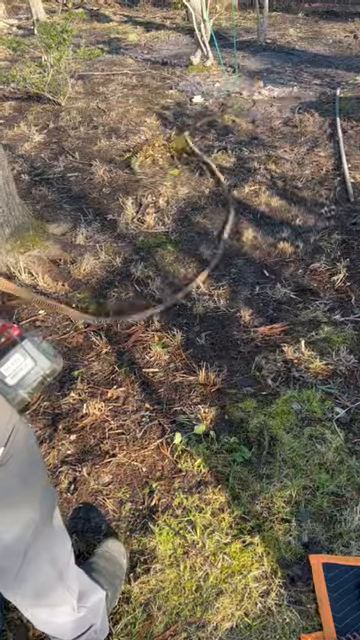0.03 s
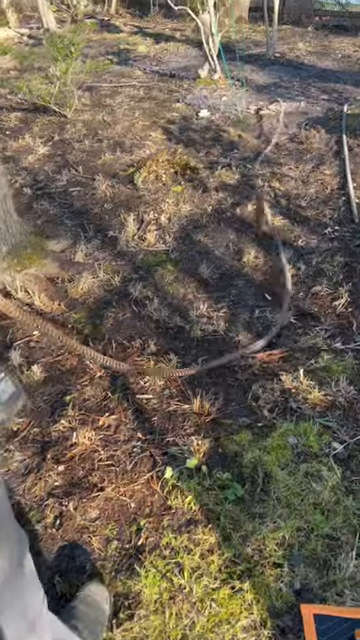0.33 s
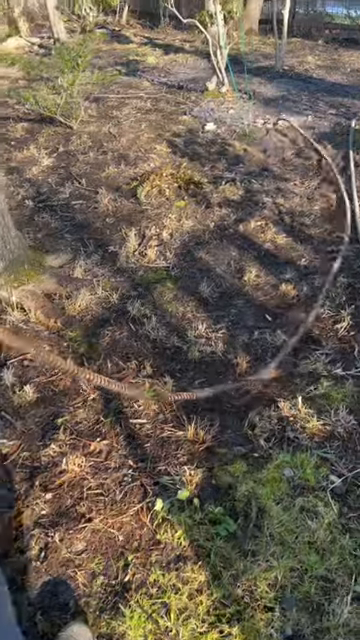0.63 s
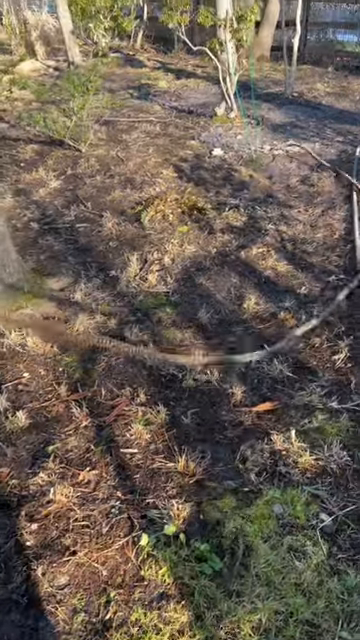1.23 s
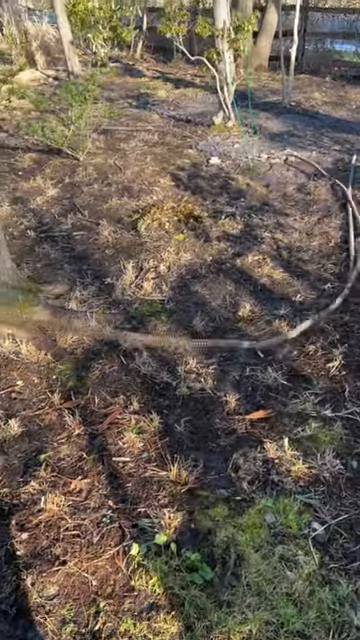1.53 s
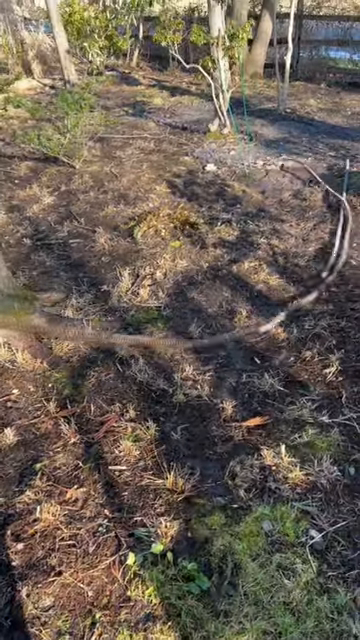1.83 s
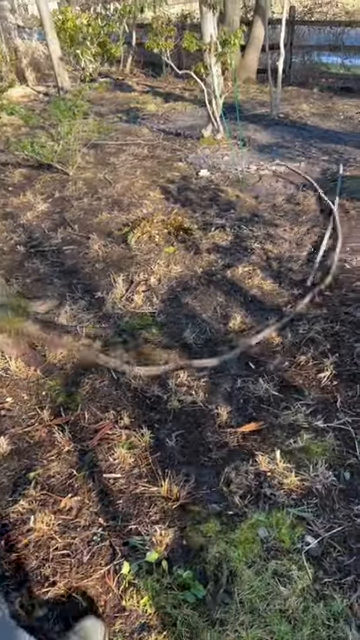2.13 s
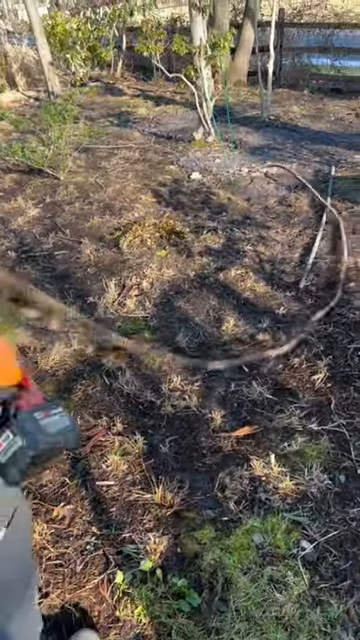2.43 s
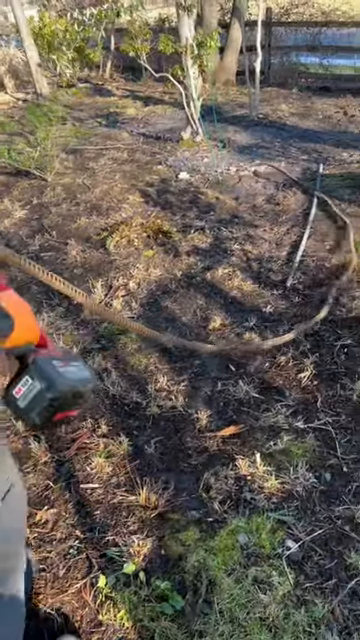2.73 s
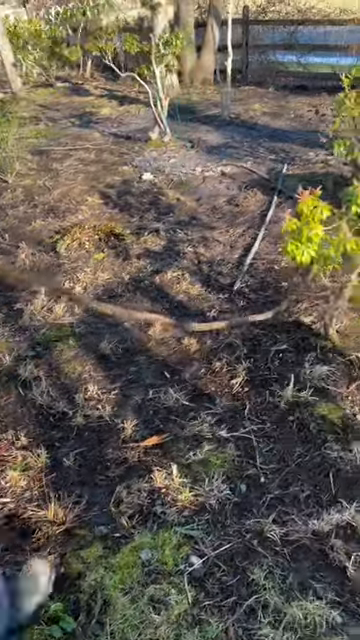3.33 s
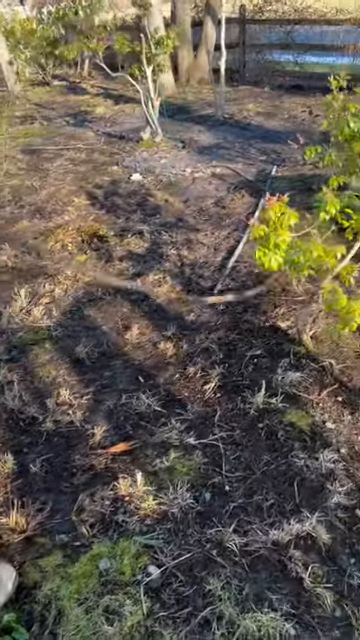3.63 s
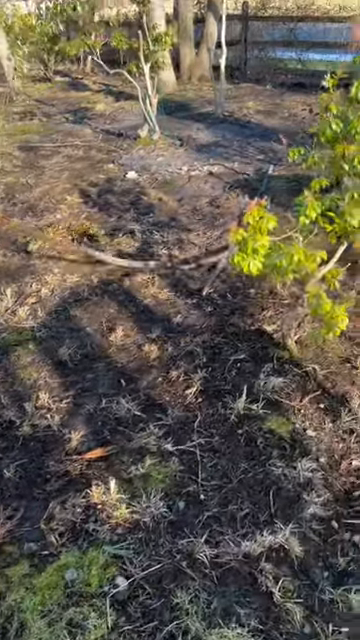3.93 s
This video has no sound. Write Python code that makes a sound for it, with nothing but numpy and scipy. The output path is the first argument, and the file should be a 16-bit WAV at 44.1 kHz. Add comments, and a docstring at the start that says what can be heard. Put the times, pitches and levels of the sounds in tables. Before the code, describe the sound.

A battery-powered drain cleaning machine whines nearby outdoors throughout, over churning gears and rushing air. Its pitch dips around 0.3 seconds and recovers by 0.9. The spinning coiled cable rasps continuously, with sharp metallic scrapes and dull thuds on soil in the first second. Lighter scrapes and bumps follow now and then, while the whine swells and fades, growing gradually quieter toward 4 seconds.

```python
"""Battery drain cleaner in a yard.

The motor whines, sags under load and recovers, over a rush of cooling air; its gears sing and churn.
The long coiled cable spins, rasping once a turn; it scrapes, brushes the ground and thuds on the soil.
Each whine swells and fades as the machine and the listener move."""
import sys
import numpy as np
from scipy import signal
from scipy.fft import rfft, irfft, next_fast_len
from scipy.io import wavfile
from scipy.ndimage import uniform_filter1d, map_coordinates

SR = 44100
rng = np.random.default_rng(int(sys.argv[2]) if len(sys.argv) > 2 else 0)


def to_wav(sig):
    """Store sig (one row per channel, or 1-D mono) as 16-bit WAV at the path in sys.argv[1].

    Samples outside -1..1 are clipped; the rate is SR.
    """
    pcm = np.clip(np.atleast_2d(sig), -1, 1) * 32767
    pcm = np.round(pcm).astype(np.int16)
    wavfile.write(sys.argv[1], SR, pcm.T)  # frames by channels


N = 176400

# noise, left-right likeness: freq_hz, correlation
STEREO_LIKENESS = [(60, .995), (150, 0.97), (600, 1), (1200, 0.95), (1900, 1), (4000, 1), (5500, 0.91),
                   (9000, .86), (15000, .55)]
# noise, left over right: freq_hz, pan_db
STEREO_PAN = [(250, 0), (600, 1.5), (1200, 5), (2500, -3.8), (5000, 1), (8000, 0)]
# noise, left phase lead: freq_hz, lead_rad
STEREO_LEAD = [(100, -0.11), (4000, -0.25), (5600, -0.74), (7200, -1.36), (12000, -1.4), (16000, -1.9)]

# motor shaft: time_s, speed_hz
MOTOR_SPEED = [(0.0, 356.5), (0.09, 349.8), (0.22, 337.8), (0.36, 338.9), (0.41, 343.7), (0.68, 350.2),
               (0.86, 359.5), (1.02, 357.9), (1.16, 361.0), (1.22, 359.6), (1.32, 364.2), (1.39, 358.2),
               (1.47, 361.3), (1.52, 357.5), (1.58, 359.4), (1.92, 360.4), (2.0, 362.6), (2.12, 360.8),
               (2.68, 360.3), (3.0, 361.8), (3.18, 358.1), (3.3, 357.8), (3.38, 361.4), (3.44, 357.9),
               (3.5, 361.0), (3.57, 359.3), (4.0, 359.6)]
# cooling air: time_s, level_db
AIR_LEVEL = [(0.05, -55), (0.09, -43.5), (0.54, -36.5), (0.63, -39), (0.86, -34.5), (0.93, -38),
             (1.84, -38.5), (2.62, -46.5), (3.48, -42), (4.0, -46.5)]
# cooling air: freq_hz, gain_db
AIR_SPECTRUM = [(300, -35), (1000, -1), (1900, -14.5), (2700, -5.5), (3500, -2), (4300, -1.5), (5100, -7),
                (6500, -8), (9000, -12), (12000, -13), (16000, -24)]
# shaft-rate hum: time_s, level_db
HUM_LEVEL = [(.06, -41.5), (.66, -47.5), (.95, -41.5), (1.7, -39.5), (1.98, -45.5), (2.64, -50.5),
             (3.44, -47.5), (3.68, -62), (3.98, -54)]
# whines at shaft orders 8, 9, 13, 18: time_s, level_db, pan_db, lead_rad
WHINE_8_PATH = [(0.06, -28, 4.0, 1.0), (0.14, -25, -4.0, 0.78), (0.36, -22.5, 0, 0.6),
                (0.58, -18.5, 1.0, 0.7), (0.94, -23.5, 2, 0.56), (1.3, -29.0, -2.0, 1.34),
                (1.82, -26.5, 4.0, 1.0), (2.0, -30.0, 6, 0.93), (2.18, -27.5, 1, 0.3), (2.56, -32.5, 1, 0),
                (2.68, -30.5, 1.0, 0.0), (2.94, -36.5, 2, 0.43), (3.08, -28.0, 0.5, -0.0),
                (3.36, -29, 2, 0.93), (3.56, -28.0, 3, 0.4), (3.84, -43.0, 5, 0.2), (3.9, -33.5, 2, -0.0),
                (3.98, -37.0, 3, 0.14)]
WHINE_9_PATH = [(0.06, -29.5, 5, 0.32), (0.22, -41.0, 15.0, 2.0), (0.26, -38, 6, 1.0),
                (0.54, -23.5, 2, 0.8), (1.06, -29, 2, -0.1), (1.26, -40, 14, 0.5), (1.42, -32, 4, 2.2),
                (1.94, -33.5, 7, 0.7), (2.54, -34.0, -7, 0.0), (2.96, -36, 1, -0.038),
                (3.04, -42, -1.0, 0.1), (3.34, -42, 3, -1), (3.42, -43.0, 14, 0.3), (3.5, -47, 11, 0.1),
                (3.54, -38, 2, 0.2), (3.74, -38.5, 4, -0.059), (3.86, -52, -1.0, 0.1), (3.98, -47, 7, -0.1)]
WHINE_13_PATH = [(.06, -30.5, 1.5, 0), (.26, -28.5, -4, 0), (.46, -31, 4, -.1), (.54, -29, 2, -.1),
                 (.96, -25, 4.5, .2), (1.32, -27, 3, 1), (1.9, -28, 9, .3), (2.23, -31.5, 2.5, 0),
                 (2.28, -42, 4, .3), (2.36, -40.5, 12, .4), (2.48, -36.5, 3, -.9), (2.54, -45, 17, -.7),
                 (2.74, -31.5, 1.5, .1), (2.9, -34, 4, 0), (3.01, -37, 5, -.1), (3.07, -28.5, 1, 0),
                 (3.3, -31.5, 0, 0), (3.52, -29.5, -1.5, 0), (3.58, -38, -3, 0), (3.62, -28.5, -2, 0),
                 (3.7, -34, -1, 0), (3.79, -31, -.5, .1), (3.9, -44, -7, .3), (3.98, -47, -10, .4)]
WHINE_18_PATH = [(0.06, -36, 1.0, -1.4), (0.52, -46, 0.0, -0.9), (0.78, -23, 1.5, -1.86),
                 (1.38, -35.5, -0.0, -0.74), (1.62, -27.0, 0.85, -1.1), (2.16, -37, -0.0, -1.1),
                 (2.58, -39.5, 1.0, -1.3), (2.94, -51, -1.0, -1.2), (3.1, -48, -0.0, -1.0),
                 (3.28, -60, 1.0, -1.1), (3.62, -40, -0.0, -1.3), (3.98, -42, -0.17, -1.1)]
# partials, one list per whine: shaft_order, gain_db
WHINE_PARTIALS = [
    [(8, 0)],
    [(9, 0), (8.805, -10), (9.195, -15)],
    [(13, 0), (26, -15), (39, -23)],
    [(18, -2.5), (17.805, -5.5), (18.195, -6.5)],
]

# gearbox: time_s, level_db
GEAR_LEVEL = [(0.05, -24.5), (0.28, -23.5), (0.5, -26), (0.86, -25.5), (1.02, -27), (1.69, -28),
              (2.55, -32), (3.4, -32.5), (3.91, -39), (4.0, -37.5)]
# mesh tones and weak shaft orders: shaft_order, gain_db, roughness
GEAR_PARTIALS = [(1.643, -5.5, 0.11), (2.739, -7.5, 0.13), (3.272, -14.5, 0.08), (3.87, -20, 0),
                 (5.46, -13.5, 0.08), (10.2, -23, 0.3), (11.02, -25, 0.3), (11.8, -26, .2),
                 (16.9, -19, 0.4), (17, -33, .3), (26.805, -20, 0), (27, -15.5, 0.1)]
# gear churn: freq_hz, gain_db
CHURN_SPECTRUM = [(100, -53), (250, -18.5), (400, -13.5), (600, -0.5), (850, 2), (1200, 2), (1450, -11),
                  (2000, -10.5), (3000, -12), (6000, -33)]
# rush near 2 kHz: time_s, level_db
MID_LEVEL = [(.05, -31), (.3, -32.5), (.55, -35), (.77, -32), (1.05, -36.5), (1.6, -37), (1.95, -38),
             (2.4, -37.5), (2.85, -40), (3.2, -38.5), (3.6, -37.5), (4, -36)]
# rush near 2 kHz: freq_hz, gain_db
MID_SPECTRUM = [(900, -35), (1450, -5.5), (1950, -0.5), (2400, -4), (3000, -4), (4500, -52)]

# cable rub: time_s, level_db
RUB_LEVEL = [(.05, -24), (.15, -25), (.3, -22), (.45, -23), (.6, -24.5), (.7, -23.5), (.92, -24),
             (1.05, -28.5), (1.25, -29.5), (1.4, -28.5), (1.46, -30.5), (2, -32), (2.5, -30), (2.54, -33.5),
             (2.57, -31), (3.2, -31.5), (3.84, -31), (3.92, -35), (4, -31)]
# cable rasp, coil ring, grit crunch: freq_hz, gain_db
RASP_SPECTRUM = [(1000, -14.5), (2000, -6.5), (4000, -19.5), (5500, -12.5), (6800, -6.5), (7600, 0.5),
                 (9500, 0.5), (11000, -5), (12200, -18.5), (14000, -7.5), (16000, -16)]
RING_SPECTRUM = [(2000, -15), (5500, -22), (7000, -10.5), (7600, -3), (8100, 6), (8800, -21.5),
                 (11000, -8.5), (12500, -24), (16000, -17.5)]
CRUNCH_SPECTRUM = [(1000, -18), (3000, -5), (5500, -13), (8000, -1), (11000, 4), (12500, -5), (16000, -6)]
# cable thudding on soil, brushing the ground: time_s, level_db
THUD_LEVEL = [(.05, -36), (.09, -39), (.15, -31), (.22, -27.5), (.33, -39.5), (.4, -35.5), (.5, -33.5),
              (.58, -43), (.68, -45), (.72, -38.5), (.8, -32.5), (.92, -34), (.98, -61), (1.11, -41),
              (1.18, -63), (1.3, -70), (1.5, -56), (1.58, -40), (1.68, -46), (1.8, -40.5), (2, -41),
              (2.12, -42), (2.2, -60), (2.35, -53), (2.7, -48.5), (2.9, -42.5), (3.1, -52), (3.24, -47),
              (3.45, -52), (3.64, -55), (3.72, -39.5), (3.8, -37.5), (3.9, -43), (4, -42)]
BRUSH_LEVEL = [(.05, -46), (.3, -33), (.55, -49), (.8, -42), (1.1, -45.5), (1.6, -47), (2.1, -48.5),
               (2.4, -44), (2.7, -67), (3.5, -65), (3.9, -49)]
# thuds, brushing, heavier bumps: freq_hz, gain_db
THUD_SPECTRUM = [(20, -38), (40, -10), (65, 0.5), (110, -2.5), (180, -5.5), (300, -10), (500, -19),
                 (1200, -42)]
BRUSH_SPECTRUM = [(25, -26), (100, -5), (180, -6), (300, -6), (500, 0), (900, -3), (2000, -37)]
BUMP_SPECTRUM = [(25, -30), (70, 6), (200, -4), (450, 4), (900, -17), (2500, -45)]
# coil scrapes: centre_s, length_s, level_db, crunch_share
COIL_SCRAPES = [(0.154, .008, -14.5, 0.54), (0.233, 0.013, -21, .6), (.337, 0.0089, -13, 0.5),
                (0.398, 0.016, -18, 0), (0.42, .010, -15, 0), (0.457, .014, -13, 0.1),
                (0.507, 0.017, -15.5, 0.4), (0.555, .026, -15, 0), (.587, .012, -11.5, .2),
                (0.616, 0.022, -16.5, 0), (0.67, .014, -18.5, 0.1), (1.144, .012, -21, 0.7),
                (1.288, .025, -27.5, .4), (1.405, .025, -27, .8), (2.406, 0.0062, -25, .8),
                (2.51, .012, -27, .8), (3.162, 0.016, -39, 0.8), (3.54, .008, -29, .5)]
# heavier bumps on soil: centre_s, length_s, level_db
SOIL_BUMPS = [(0.157, 0.027, -18.5), (0.275, 0.028, -35), (0.487, .015, -31), (.715, .015, -34),
              (0.897, .022, -32), (1.96, .025, -36), (2.027, .015, -35)]

CABLE_TURNS_PER_MOTOR_TURN = .047


def amp(db):
    """Decibels to gain."""
    return 10 ** (np.asarray(db) / 20)


def unit(x):
    """Scale to rms 1."""
    return x / np.sqrt(np.mean(x ** 2) + 1e-20)


def at_hz(table, hz):
    """Interpolate on a log frequency axis."""
    freq_hz, values = np.transpose(table)
    return np.interp(np.log(hz + 1), np.log(freq_hz + 1), values)


def curves(table):
    """Per-sample curve for each column after time_s."""
    time_s, *columns = np.transpose(table)
    return [np.interp(np.arange(N) / SR, time_s, column) for column in columns]


def wobble(rate_hz):
    """Smooth random curve through unit-variance knots."""
    knots = rng.standard_normal(int(N * rate_hz / SR) + 4)
    return map_coordinates(knots, [np.arange(N) * rate_hz / SR])


def swell(centre_s, length_s):
    """Gaussian envelope."""
    return np.exp(-2 * ((np.arange(N) / SR - centre_s) / length_s) ** 2)


def filtered(x, response):
    """Apply response(hz) by FFT."""
    size = next_fast_len(N + SR // 4)
    return irfft(rfft(x, size) * response(np.fft.rfftfreq(size, 1 / SR)), size)[..., :N]


def split(difference):
    """Plus half to the left, minus half to the right."""
    return np.array([[.5], [-.5]]) * difference


def lead_phasors(hz):
    """Left and right phase factors for noise."""
    return np.exp(1j * split(at_hz(STEREO_LEAD, hz)))


def noise(spectrum, grit_db=0):
    """Coloured stereo noise, rms 1; grit_db makes it grainy."""
    def mid_side_gains(hz):
        width_rad = np.arccos(np.clip(at_hz(STEREO_LIKENESS, hz), -1, 1)) / 2
        return amp(at_hz(spectrum, hz)) * [np.cos(width_rad), np.sin(width_rad)]

    grains = rng.standard_normal((2, N)) * amp(grit_db * wobble(1500))
    mid, side = filtered(grains, mid_side_gains)
    stereo = np.array([mid + side, mid - side])
    return unit(filtered(stereo, lambda hz: amp(split(at_hz(STEREO_PAN, hz))) * lead_phasors(hz)))


def patchy(x, depth_db):
    """Narrow bands flare and fade independently; rms 1."""
    bands = signal.stft(x, nperseg=512)[2]
    patches = rng.standard_normal(bands.shape[1:])
    for axis in (0, 1):
        patches = uniform_filter1d(patches, size=5, axis=axis)
    return unit(signal.istft(bands * amp(depth_db * unit(patches)), nperseg=512)[1][:, :N])


def tone(phase_rad, roughness, lead_rad=0):
    """Stereo partial trembling in level and phase; rms near 1."""
    phase_rad = phase_rad + rng.uniform(0, 2 * np.pi) + split(lead_rad)
    in_phase = (1 + roughness * wobble(110)) * np.cos(phase_rad)
    quadrature = roughness * wobble(110) * np.sin(phase_rad)
    return np.sqrt(2) * (in_phase + quadrature)


def shaft_angle(ripple_depth=.0025, jitter_depth=.002):
    """Motor angle; cable drag ripples the speed once a cable turn."""
    speed_hz, = curves(MOTOR_SPEED)
    cable_turns = CABLE_TURNS_PER_MOTOR_TURN * np.cumsum(speed_hz) / SR
    ripple = ripple_depth * np.sin(2 * np.pi * cable_turns)
    return 2 * np.pi * np.cumsum(speed_hz * (1 + ripple + jitter_depth * wobble(45))) / SR


def motor(shaft_rad):
    """Rush of cooling air, plus a hum and whines locked to the shaft."""
    out = amp(curves(AIR_LEVEL)[0] + 7.5 + 1.1 * wobble(25.2)) * noise(AIR_SPECTRUM)
    out += amp(curves(HUM_LEVEL)[0]) * tone(shaft_rad, roughness=.19)
    paths = [WHINE_8_PATH, WHINE_9_PATH, WHINE_13_PATH, WHINE_18_PATH]
    for path, partials in zip(paths, WHINE_PARTIALS):
        level_db, pan_db, lead_rad = curves(path)
        whine = sum(amp(gain_db) * tone(order * shaft_rad, roughness=.11, lead_rad=lead_rad)
                    for order, gain_db in partials)
        out += amp(level_db + split(pan_db) + .6 * wobble(14)) * whine
    return out


def gears(shaft_rad, mesh_order=.548, mesh_depth=.27, pan_db=2.5):
    """Mesh tones, and churn that pulses as the teeth pass."""
    tones = sum(amp(gain_db) * tone(order * shaft_rad, roughness)
                for order, gain_db, roughness in GEAR_PARTIALS)
    pulse = 1 + mesh_depth * np.sin(mesh_order * shaft_rad)
    churn = noise(CHURN_SPECTRUM) * pulse * amp(-2.5 + .54 * wobble(25.37))
    return amp(curves(GEAR_LEVEL)[0]) * (amp(split(pan_db)) * tones + churn)


def mid_rush():
    """Dry band near 2 kHz, swelling apart from the whines."""
    return amp(curves(MID_LEVEL)[0]) * patchy(noise(MID_SPECTRUM), depth_db=1.5)


def grit_ticks(rate_hz=260, spread_db=2):
    """Grit flicked against the coil: random clicks, rms 1."""
    hits = rng.random(N) < rate_hz / SR
    strength = amp(spread_db * np.clip(rng.standard_normal(N), -2, 2))
    clicks = hits * strength * (1 + .33 * rng.standard_normal((2, N)))
    return unit(filtered(clicks, lambda hz: amp(at_hz(CRUNCH_SPECTRUM, hz)) * lead_phasors(hz)))


def cable_rub(shaft_rad, turn_db=.53, flutter_db=1.17, ring_slope=.9):
    """Gritty rasp surging each turn; hard rubbing rings the steel coil."""
    rub_db, = curves(RUB_LEVEL)
    cable_rad = CABLE_TURNS_PER_MOTOR_TURN * shaft_rad + 1.2 * wobble(6.8)
    surge = amp(turn_db * np.sin(cable_rad) + flutter_db * wobble(70))
    rasp = amp(rub_db + 1.5) * patchy(noise(RASP_SPECTRUM, grit_db=1), depth_db=2.5)  # contacts shift
    ticks = amp(rub_db - 9.5) * grit_ticks()
    ring_db = rub_db.max() - 14 + ring_slope * (rub_db - rub_db.max())
    ring = amp(ring_db) * noise(RING_SPECTRUM, grit_db=1)
    return surge * (rasp + ticks + ring)


def soil_thuds(lump_db=3.5):
    """Dull, lumpy thudding of the cable on soil."""
    lumps = amp(lump_db * wobble(45))
    return amp(curves(THUD_LEVEL)[0] + 2) * unit(lumps * noise(THUD_SPECTRUM))


def ground_brushing(waver_db=2):
    """Soft, uneven brushing over the ground, different in each ear."""
    brush = filtered(rng.standard_normal((2, N)), lambda hz: amp(at_hz(BRUSH_SPECTRUM, hz)))
    return amp(curves(BRUSH_LEVEL)[0]) * unit(brush * amp(waver_db * wobble(24.9)))


def coil_scrapes(stutter_db=1.1):
    """The coil catches: short bursts, part ring, part crunch."""
    ring = noise(RING_SPECTRUM, grit_db=1)
    crunch = noise(CRUNCH_SPECTRUM, grit_db=1)
    out = 0
    for centre_s, length_s, level_db, crunch_share in COIL_SCRAPES:
        blend = np.sqrt(1 - crunch_share) * ring + np.sqrt(crunch_share) * crunch
        out += amp(level_db) * swell(centre_s, length_s) * blend
    return out * amp(stutter_db * wobble(400))


def soil_bumps():
    """Heavier cable hits on soil: short bursts of low noise."""
    envelope = sum(amp(level_db) * swell(centre_s, length_s)
                   for centre_s, length_s, level_db in SOIL_BUMPS)
    return envelope * noise(BUMP_SPECTRUM)


def scene():
    """One shaft drives motor, gears and cable, in open air."""
    shaft_rad = shaft_angle()
    machine = motor(shaft_rad) + gears(shaft_rad) + mid_rush()
    cable = cable_rub(shaft_rad) + soil_thuds() + ground_brushing() + coil_scrapes() + soil_bumps()
    return machine + cable


def record(dry, start_s=.036, ceiling=.72, cutoff_hz=16150):
    """Abrupt start, soft clip, brick-wall low-pass."""
    gated = dry * (np.arange(N) / SR > start_s)
    clipped = gated / (1 + np.abs(gated / ceiling) ** 6) ** (1 / 6)
    return filtered(clipped, lambda hz: hz < cutoff_hz)


dry = scene()
out = record(dry)
to_wav(out)
```